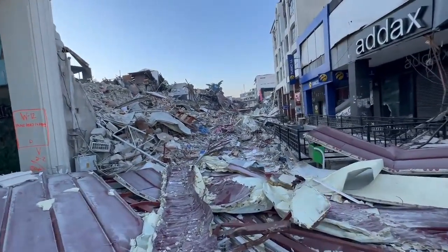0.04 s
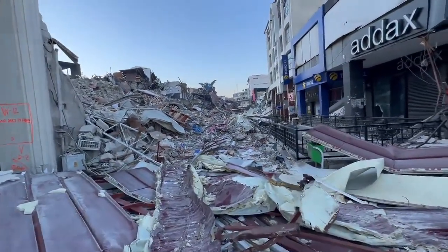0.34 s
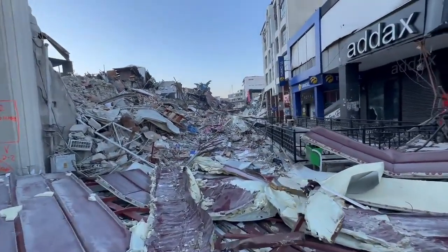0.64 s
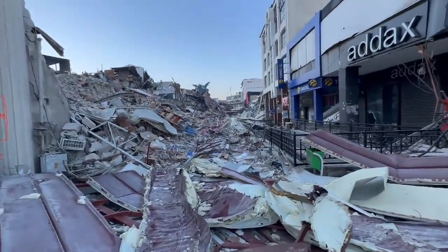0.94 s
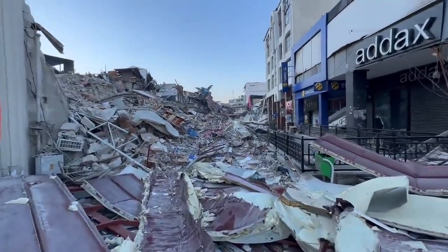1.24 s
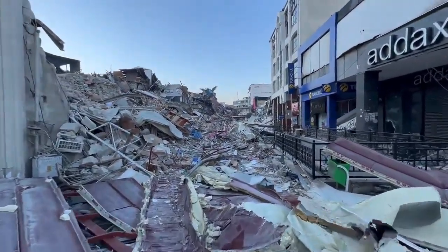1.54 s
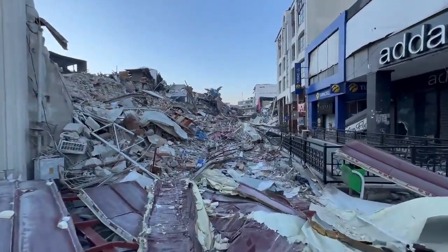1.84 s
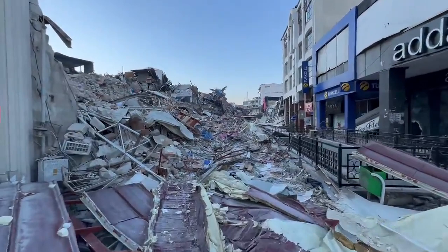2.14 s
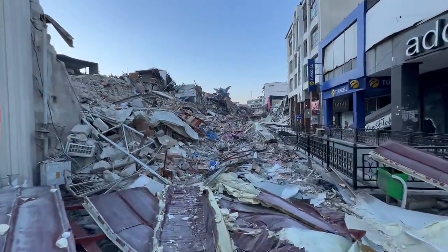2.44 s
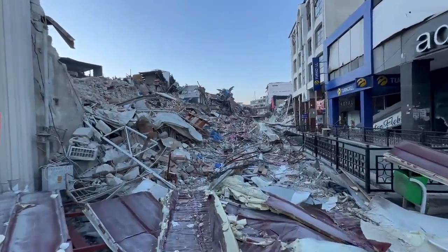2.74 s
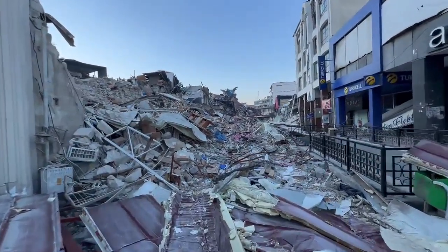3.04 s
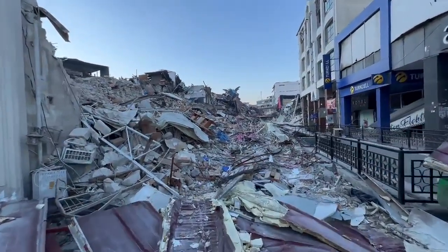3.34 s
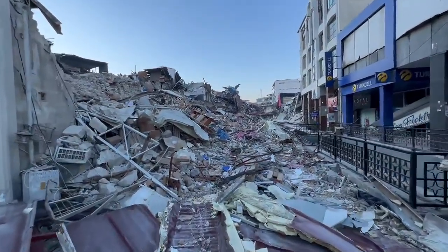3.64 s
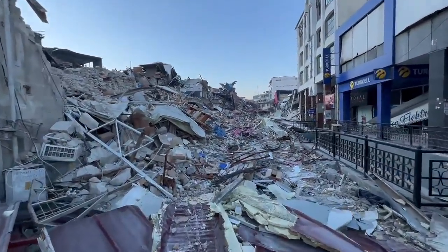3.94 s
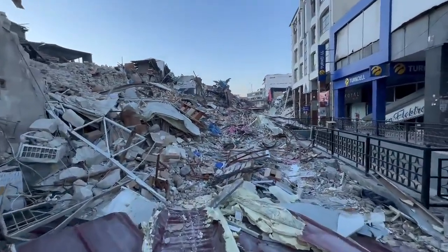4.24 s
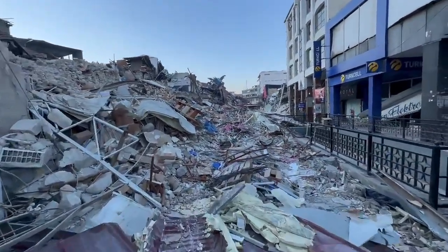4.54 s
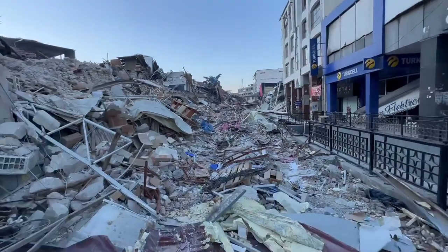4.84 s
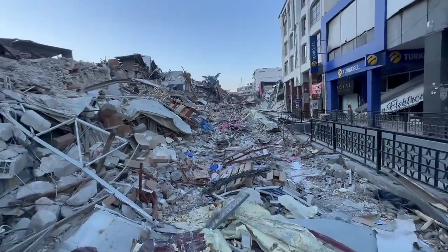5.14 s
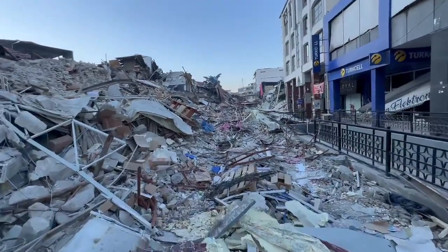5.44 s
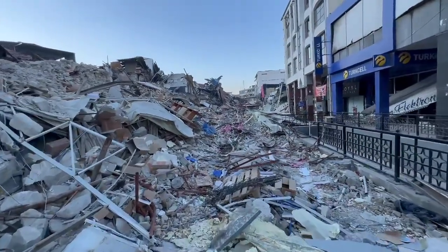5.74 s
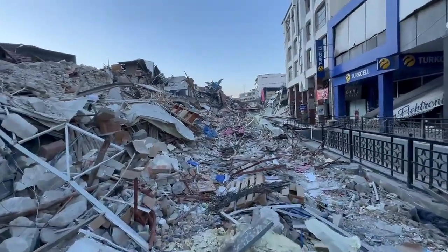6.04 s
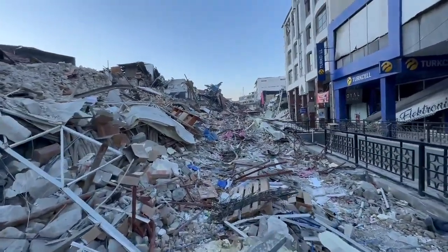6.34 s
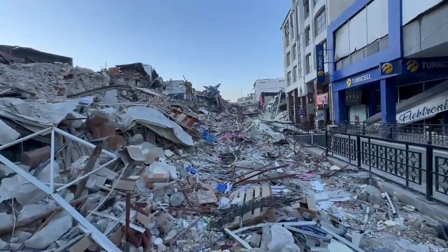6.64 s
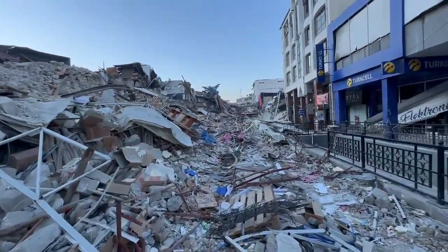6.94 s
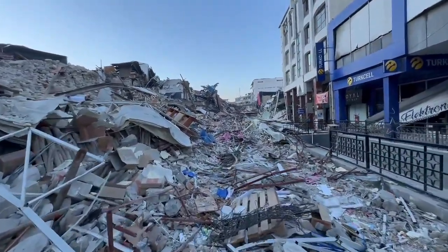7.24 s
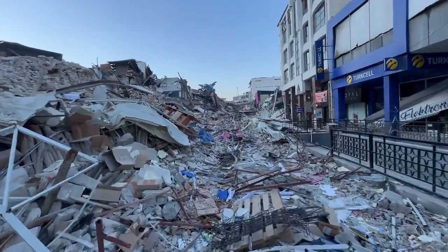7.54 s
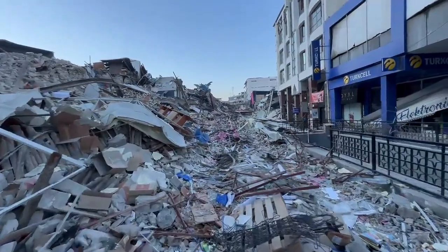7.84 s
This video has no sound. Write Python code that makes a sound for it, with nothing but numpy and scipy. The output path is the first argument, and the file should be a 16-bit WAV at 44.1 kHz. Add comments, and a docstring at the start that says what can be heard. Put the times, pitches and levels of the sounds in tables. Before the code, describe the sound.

Slow, uneven footsteps cross broken concrete and fallen metal roofing in a ruined street. Each step crushes grit, snaps small chips and knocks loose pieces together, making the sheets rumble and briefly ring. The clatter grows louder in the last few steps. Light wind buffets the hand-held microphone, fingers bump it softly, and a faint low outdoor rumble lies underneath.

```python
"""Footsteps pick a way over fallen roofing sheets and broken concrete in a ruined street.
They snap chips, crush grit and knock loose panels and lumps together, which sets the metal ringing.
As the weight rolls on, the sheet rumbles and rubble crunches; there are short scrapes and faint ticks.
The street murmurs and gives a short, dull echo. Light wind buffets the hand-held microphone,
and shifting fingers bump its housing."""
import sys
import numpy as np
from scipy import signal
from scipy.fft import rfft, irfft, next_fast_len
from scipy.io import wavfile

SR = 44100
rng = np.random.default_rng(int(sys.argv[2]) if len(sys.argv) > 2 else 0)


def wrap_up_sound(samples):
    """Save the sound to the file named by the first command line argument, as 16-bit audio."""
    columns = np.atleast_2d(samples).T
    # keep every value between -1 and 1, then stretch to whole-number steps
    tamed = np.clip(columns, -1, 1)
    steps = np.round(tamed * 32767).astype(np.int16)
    wavfile.write(sys.argv[1], SR, steps)


N = 351918

# Levels are relative. A fade (t60) is the time a sound takes to drop by 60 dB.
# wind on the microphone: (time [s], level [dB])
WIND_LEVELS = [(0.0, -58), (0.42, -42), (0.8, -48.5), (5.7, -54), (6.2, -42.5), (6.93, -36.5),
               (7.98, -35.5)]
# tone of the wind and of the street: (frequency [Hz], level [dB])
WIND_TONE = [(20, 3), (45, 18.5), (65, 23.5), (95, 20.5), (130, 10), (220, -38)]
STREET_TONE = [(100, 8), (200, -1), (400, -9), (900, -8), (1400, -8), (2500, -21), (7500, -29.5),
               (11000, -44), (15500, -50)]
# chips snapping and longer bursts of crushed grit under the sole:
# (time [s], base fade [s], main level [dB], glassy edge level [dB])
SNAPS_AND_GRIT = [(0.034, 0.24, -41.5, -62), (0.086, 0.11, -32.5, -38.5), (0.647, 0.05, -52, -70),
                  (0.77, 0.048, -45, -68), (1.244, 0.03, -38, -37), (1.438, 0.04, -43.5, -60),
                  (1.975, 0.037, -42.5, -66), (2.207, 0.043, -36, -56), (2.689, 0.055, -50, -70),
                  (3.066, 0.11, -43, -57), (3.093, 0.04, -32.5, -42.5), (3.563, 0.041, -36, -64),
                  (3.985, 0.038, -39.5, -53), (4.014, 0.02, -31.5, -41), (4.061, 0.024, -38, -56),
                  (4.084, 0.054, -31.5, -48), (4.131, 0.081, -36, -48), (4.152, 0.03, -36, -46),
                  (4.299, 0.028, -40, -49), (4.666, 0.04, -35, -54), (4.796, 0.015, -42, -56),
                  (4.927, 0.046, -34, -40.5), (5.141, 0.022, -27, -28), (6.188, 0.025, -31, -62),
                  (6.762, 0.23, -39, -44.5), (6.797, 0.029, -32.5, -46), (7.496, 0.35, -38.5, -44.5),
                  (7.829, 0.021, -22, -35), (7.899, 0.07, -18, -35)]
# their main part and glassy edge: (low edge [Hz], high edge [Hz], fade [times the base fade])
SNAP_AND_GRIT_BANDS = [(1500, 7780, 1.0), (6450, 11800, 0.9)]
# how alike left and right are for sounds at the feet: (frequency [Hz], likeness [1 = the same])
STEREO_LIKENESS = [(100, 0.9), (250, 0.8), (550, 0.5), (1600, 0.55), (3500, 0.2)]
# weight rolls onto a foot: (time [s], length [s], base fade [s], rumble [dB], crunch [dB], grit [dB])
FOOTSTEPS = [(0.06, 0.27, 0.35, -35, -42.5, -43.5), (1.099, 0.15, 0.3, -37, -44, -45),
             (1.24, 0.235, 1.2, -35.5, -35.5, -44), (2.055, 0.24, 0.7, -33, -36.5, -43.5),
             (3.052, 0.39, 0.7, -36, -38.5, -44.5), (4.01, 0.36, 0.4, -39, -38, -40),
             (4.67, 0.034, 1.3, -46.5, -44.5, -45.5), (4.888, 0.27, 1.4, -34, -37.5, -45.5),
             (5.845, 0.47, 1.1, -37, -41, -46), (6.178, 0.067, 0.23, -27, -25.5, -50),
             (6.764, 0.14, 0.9, -33, -36.5, -45), (6.91, 0.23, 1, -48.5, -50, -48),
             (7.29, 0.2, 9, -37.5, -42, -51.5), (7.479, 0.052, 0.3, -35.5, -36, -38.5),
             (7.758, 0.06, 0.3, -39, -37, -42), (7.813, 0.13, 1.2, -22, -27, -30.5)]
# sheet, rubble and grit underfoot: (rise [s], fade [times the base fade], level between steps [dB])
GROUND_LAYERS = [(0.015, 1.4, -52), (0.02, 0.78, -59.5), (0.032, 0.88, -66.5)]
# tone of the sheet, rubble, grit and lone bits of gravel: (frequency [Hz], level [dB])
RUMBLE_TONE = [(100, 0.5), (190, -5), (320, -2), (400, -4.5), (540, -17.5)]
CRUNCH_TONE = [(500, -2.5), (1000, -1.5), (1500, -4.5), (2300, -8)]
GRIT_TONE = [(2200, 3.5), (4500, -1.5), (6500, -2.5), (8800, -5.5), (10500, -34), (15500, -18)]
CRUMB_TONE = [(900, 0), (6000, -3)]
# panels and lumps knocking; a harder contact has a higher cut-off:
# (time [s], pitch [Hz], base fade [s], level [dB], bass lift from weight [dB], cut-off [Hz])
DEBRIS_KNOCKS = [(0.063, 1620, 0.05, -36, -1.5, 1450), (0.084, 1056, 0.13, -26, -1, 1400),
                 (0.116, 1440, 0.068, -22.5, -5, 2000), (0.295, 333, 0.094, -37.5, -2, 750),
                 (0.472, 520, 0.08, -40.5, 2, 850), (0.545, 780, 0.063, -43.5, -2, 795),
                 (1.195, 1060, 0.06, -36, -7, 900), (1.31, 330, 0.13, -39, 2.5, 1500),
                 (1.565, 417, 0.14, -41.5, -1, 950), (2.055, 300, 0.07, -33, -4, 1000),
                 (2.085, 1000, 0.035, -35, -10, 1400), (2.119, 310, 0.04, -31, -12, 450),
                 (2.388, 1100, 0.025, -43, -15, 1400), (2.957, 715, 0.05, -30, -9, 1050),
                 (3.091, 420, 0.062, -21.5, -8, 2100), (3.392, 970, 0.051, -35.5, -0.5, 1930),
                 (3.565, 1890, 0.061, -41, -22, 5950), (4.012, 1680, 0.042, -39.5, 0, 3000),
                 (4.119, 277, 0.1, -34, 2, 2000), (4.301, 212, 0.074, -39.5, 4.5, 800),
                 (4.442, 1410, 0.08, -40.5, -13, 3630), (4.665, 1300, 0.079, -42.5, -1, 4000),
                 (4.88, 270, 0.06, -35.5, 6.5, 550), (4.928, 816, 0.06, -36, -1, 2000),
                 (5.141, 950, 0.05, -33, -22, 5000), (5.497, 117, 0.1, -42.5, 3.5, 750),
                 (5.948, 388, 0.053, -37, 2.5, 650), (6.125, 1460, 0.028, -20.5, -20, 1250),
                 (6.145, 290, 0.06, -24, -6, 1050), (6.187, 980, 0.072, -17, -4, 3700),
                 (6.211, 448, 0.06, -23.5, -3.5, 1500), (6.229, 1015, 0.075, -27.5, 0, 2600),
                 (6.245, 895, 0.062, -26.5, -4, 2400), (6.762, 1100, 0.057, -29.5, -3.5, 520),
                 (6.797, 1073, 0.047, -20.5, -1, 1650), (6.842, 950, 0.08, -33, -1.5, 1900),
                 (6.943, 700, 0.07, -38, -4, 1000), (7.289, 1684, 0.024, -39, -16, 1210),
                 (7.313, 113, 0.056, -41, 8, 1300), (7.344, 91.5, 0.061, -45.5, 13, 1500),
                 (7.493, 364, 0.19, -31.5, -0.5, 1600), (7.659, 1150, 0.044, -25, -6, 900),
                 (7.786, 1650, 0.058, -31, -8, 1700), (7.829, 416, 0.059, -15.5, -2.5, 1500),
                 (7.863, 560, 0.11, -15.5, -2.5, 1210), (7.905, 755, 0.063, -15, -20, 800)]
# a knock's thud, body, clank, edge and crack: (low edge [Hz], high edge [Hz], fade [times the base fade])
KNOCK_BANDS = [(58.3, 276, 2.3), (250, 760, 1.2), (720, 1450, 1.1), (1450, 2900, 1.0), (2400, 5200, 1.2)]
# notes of the loose roofing: (pitch [Hz], level [dB])
SHEET_NOTES = [(318, 1), (603, 0), (1614, 0), (2257, 2), (2607, 6)]
# fingers shifting on the housing: (time [s], level [dB], cut-off [Hz])
FINGER_BUMPS = [(0.297, -31, 300), (0.46, -27, 330), (0.502, -33, 380), (0.59, -31.5, 100),
                (1.71, -30, 212), (2.415, -32.5, 170), (3.37, -30, 302), (3.712, -36, 130),
                (5.486, -25.5, 171)]
# short scrapes and faint, brief ticks of debris: (time [s], length [s], level [dB], starting pitch [Hz])
SCRAPES_AND_TICKS = [(1.099, 0.125, -36.5, 1100), (1.655, 0.035, -48.5, 1500), (1.861, 0.004, -48, 1570),
                     (3.27, 0.03, -37.5, 1200), (4.224, 0.02, -39, 1150), (5.753, 0.004, -53, 1700),
                     (6.228, 0.028, -28, 2400), (6.698, 0.006, -48, 1500)]
# tone of the microphone's shaded right opening: (frequency [Hz], level [dB])
RIGHT_TONE = [(2000, -2.5), (2500, -6), (3200, -14), (4500, -10.5), (5500, -10.5), (6800, -17),
              (7900, -4.5), (9000, -2.5)]
# narrow dips in the microphone's treble: (frequency [Hz], width [Hz])
MIC_DIPS = [(5225, 200), (7540, 340)]


def from_db(db):
    """Turn decibels into a factor to multiply by."""
    return np.exp(np.asarray(db) * (np.log(10) / 20))


def rms_one(x):
    """Scale a sound to an average power of 1."""
    return x / np.sqrt(np.mean(x ** 2) + 1e-20)


def in_time(rows):
    """Fill in a table's columns at every sample."""
    times, *columns = np.transpose(rows)
    return [np.interp(np.arange(N) / SR, times, column) for column in columns]


def at_hz(points, hz):
    """Read a table at any frequency, with octaves evenly spaced."""
    frequencies, values = np.transpose(points)
    return np.interp(np.log(hz), np.log(frequencies), values)


def band(x, low_hz, high_hz, order=2):
    """Keep the sound between two frequencies."""
    edges = [low_hz, min(high_hz, SR / 2.1)]
    return signal.sosfilt(signal.butter(order, edges, "band", fs=SR, output="sos"), x)


def pair(two, alike):
    """Blend two unrelated signals into left and right with the given likeness."""
    middle = np.sqrt(1 + alike) * two[0]
    sides = np.sqrt(1 - alike) * two[1] * np.array([[1], [-1]])
    return (middle + sides) / np.sqrt(2)


def ring(x, hz, t60):
    """Let a sound ring at one pitch."""
    decay = from_db(-60 / (t60 * SR))
    feedback = [1, -2 * decay * np.cos(2 * np.pi * hz / SR), decay ** 2]
    return signal.lfilter(np.array([1, 0, -1]) * (1 - decay ** 2) / 2, feedback, x + 1e-18)


def noise(tone, alike):
    """Smooth stereo noise with the given tone and a power of 1."""
    size = next_fast_len(N)
    hz = np.arange(size // 2 + 1) * SR / size + 1e-3
    gain = from_db(at_hz(tone, hz)) / np.sqrt(1 + (tone[0][0] / hz) ** 6)
    shaped = irfft(rfft(rng.standard_normal((2, size))) * gain, size)[:, :N]
    return rms_one(pair(shaped, alike))


def add(out, start_s, sound):
    """Mix a sound in at a given time."""
    at = int(start_s * SR)
    out[:, at:at + sound.shape[1]] += sound[:, :N - at]


def wind(changes_per_s=9):
    """Wind buffets the microphone: a low rumble whose level wavers at random."""
    level_db, = in_time(WIND_LEVELS)
    waver = np.interp(np.arange(N) / SR * changes_per_s, np.arange(4000), rng.standard_normal(4000))
    return from_db(level_db + 2 * waver) * noise(WIND_TONE, alike=0.5)


def street_murmur():
    """A faint, steady, low noise from all around."""
    return from_db(-45.5) * noise(STREET_TONE, alike=0.048)


def struck_piece(pitch_hz, t60, levels, bands, first_db, main_db, overtone_db, rocking_db):
    """An uneven piece is hit and chatters: one main note and a few others stand out of fading noise."""
    t = np.arange(SR // 4) / SR
    contacts = np.interp(t, np.linspace(0, t[-1], num=120), rng.standard_normal(120))
    first_hit = from_db(first_db) * np.exp(-t / 0.0011)
    force = from_db(1.76 * np.clip(contacts, -1, 1)) + first_hit
    force *= np.minimum(t / 0.0025, 1)   # rough edges need a moment to close
    overtones_hz = np.minimum(pitch_hz * 2 ** rng.uniform(0.4, 2.6, size=6), SR / 3)
    out = 0
    for level_db, (low_hz, high_hz, lasting) in zip(levels, bands):
        fall_db = -60 * t / (t60 * lasting)
        decay = from_db(fall_db) + from_db(rocking_db + fall_db / 3)   # the piece rocks on afterwards
        chatter = rng.standard_normal((2, len(t))) * force * decay
        main = from_db(main_db) * ring(chatter, pitch_hz, t60=20 / pitch_hz)
        overtones = sum(ring(chatter, hz, t60=36 / hz) for hz in overtones_hz if low_hz < hz < high_hz)
        hit = band(chatter + main + from_db(overtone_db) * overtones, low_hz, high_hz, order=3)
        hit /= np.sqrt(np.mean(hit[:, t < 0.025] ** 2, axis=1, keepdims=True))   # power 1 at the start
        out = out + from_db(level_db) * pair(hit, at_hz(STEREO_LIKENESS, np.sqrt(low_hz * high_hz)))
    return out


def snaps_and_grit():
    """Chips snap and grit is crushed in longer bursts under the sole, each at its own high pitch."""
    out = np.zeros((2, N))
    for start_s, t60, *levels in SNAPS_AND_GRIT:
        pitch_hz = 2300 * 2 ** rng.uniform(-0.58, 0.61)
        add(out, start_s, struck_piece(pitch_hz, t60, levels, SNAP_AND_GRIT_BANDS,
                                       first_db=-22.5, main_db=6.5, overtone_db=-3, rocking_db=-45))
    return out


def press(t, rise_s, length_s, t60, sag_db_per_s=7):
    """One step's loudness: it rises, sags as the rubble packs down, then dies away."""
    fall_db = sag_db_per_s * np.maximum(t, 0) + 60 * np.maximum(t - length_s, 0) / t60
    return np.clip(t / rise_s, 0, 1) * from_db(-fall_db)


def underfoot_db():
    """Rumble, crunch and grit levels follow the steps; loose debris trickles on after the foot lifts."""
    t = np.linspace(0, N / SR, num=4000)
    levels = []
    for layer, (rise_s, lasting, rest_db) in enumerate(GROUND_LAYERS):
        power = from_db(rest_db) ** 2
        for start_s, length_s, t60, *layer_db in FOOTSTEPS:
            pressed = from_db(layer_db[layer]) * press(t - start_s, rise_s, length_s, t60 * lasting)
            trickle_db = min(layer_db[layer] - 18.5, -50.5)   # only so much of it lies loose
            trickle = from_db(trickle_db) * press(t - start_s, rise_s, length_s, t60=4.4)
            power = power + pressed ** 2 + trickle ** 2
        levels.append(10 * np.log10(power))
    return in_time(np.column_stack([t, *levels]))


def grains(tone, level_db, peak_per_s, cycles, spread_db, notes):
    """Tiny slips and breaks each ring at one of several notes; they crowd together as the foot presses."""
    out = np.zeros((2, N))
    pitches = np.geomspace(tone[0][0], tone[-1][0], notes)
    pitches *= (pitches[1] / pitches[0]) ** rng.uniform(-0.5, 0.5, notes)
    rate = peak_per_s * from_db((level_db - level_db.max()) / 4)
    at = np.flatnonzero(rng.random(N) < rate / SR)
    sizes = from_db(spread_db * np.minimum(rng.exponential(1, N)[at], 3)) / np.sqrt(rate[at])
    note_of_grain = rng.integers(0, notes, N)[at]
    push = rng.standard_normal((2, N))[:, at]
    for note, hz in enumerate(pitches):
        chosen = note_of_grain == note
        clicks = np.zeros((2, N))
        clicks[:, at[chosen]] = sizes[chosen] * pair(push[:, chosen], at_hz(STEREO_LIKENESS, hz))
        out += from_db(at_hz(tone, hz)) * ring(clicks, hz, t60=cycles / hz)
    return from_db(level_db) * rms_one(band(out, pitches[0] / 2, pitches[-1] * 1.4))


def slips(per_s, t60, steady):
    """Loudness of rubble giving way: sudden jerks that die away on top of a steady grind."""
    starts = (rng.random(N) < per_s / SR) * rng.random(N)
    jerks = signal.lfilter([1], [1, -from_db(-60 / (t60 * SR))], starts)
    return rms_one(steady + jerks)


def tread():
    """Under the weight the sheet flexes, lumps grind and grit is crushed; the sole scuffs, crumbs tick."""
    rumble_db, crunch_db, grit_db = underfoot_db()
    rumble = grains(RUMBLE_TONE, rumble_db, peak_per_s=2000, cycles=15.7, spread_db=1, notes=12)
    crunch = grains(CRUNCH_TONE, crunch_db, peak_per_s=7000, cycles=34, spread_db=1, notes=16)
    grit = grains(GRIT_TONE, grit_db, peak_per_s=20000, cycles=30, spread_db=1.2, notes=16)
    scuff = from_db(grit_db - 6) * noise(GRIT_TONE, alike=0)
    crumbs = grains(CRUMB_TONE, grit_db - 8.5, peak_per_s=200, cycles=22, spread_db=1.5, notes=6)
    jerks = slips(per_s=80, t60=0.06, steady=0.8)
    return from_db(-2.5) * rumble + jerks * (crunch + from_db(-0.7) * (grit + scuff)) + crumbs


def knock_tone_db(pitch_hz, weight_db, cutoff_hz):
    """Band levels: weight sets the bass, a piece favours its own pitch, a soft contact dulls the treble."""
    hz = np.array([np.sqrt(low * high) for low, high, _ in KNOCK_BANDS])
    octaves_down = np.maximum(np.log2(1240 / hz), 0)
    bass_db = weight_db * (octaves_down / 3) ** 2
    piece_db = 4.5 * np.exp(-np.log2(hz / pitch_hz) ** 2)
    dulling_db = 10 * np.log10(1 + (hz / cutoff_hz) ** 4.9)
    return bass_db + piece_db - dulling_db


def knocks():
    """Panels and lumps clack together; their blunt edges make little top treble."""
    out = np.zeros((2, N))
    for start_s, pitch_hz, t60, level_db, weight_db, cutoff_hz in DEBRIS_KNOCKS:
        levels = level_db + knock_tone_db(pitch_hz, weight_db, cutoff_hz)
        add(out, start_s, struck_piece(pitch_hz, t60, levels, KNOCK_BANDS,
                                       first_db=-7, main_db=7, overtone_db=3, rocking_db=-33))
    return signal.sosfilt(signal.butter(6, 9500, fs=SR, output="sos"), out)


def sheet_metal(knocked, t60):
    """Every knock sets the loose roofing ringing."""
    return sum((-1) ** k * from_db(db) * ring(knocked, hz, t60) for k, (hz, db) in enumerate(SHEET_NOTES))


def street_echo(x, t60):
    """Sound bounces back, scattered and dull, from rubble heaps and shop fronts."""
    t = np.arange(SR) / SR
    envelope = from_db(-60 * t / t60) * (1 - np.exp(-t / 0.01))
    scatter = band(rng.standard_normal((2, SR)) * envelope, 100, 7000, order=1)
    scatter = pair(scatter, alike=0.081)
    scatter /= np.sqrt(np.sum(scatter ** 2) * 2)
    return signal.fftconvolve(x, scatter, axes=1)[:, :N]


def finger_bumps(rise_s=0.0083, t60=0.13, low_hz=49):
    """Each shift of the grip sends a short, dull stutter through the housing."""
    out, t = np.zeros((2, N)), np.arange(SR // 4) / SR
    envelope = np.minimum(t / rise_s, 1) * from_db(-60 * t / t60)
    sides = (1.24, -0.7)   # the shake pushes left and right in opposite directions
    for start_s, level_db, cutoff_hz in FINGER_BUMPS:
        rub = band(rng.standard_normal(len(t)) * envelope, low_hz, cutoff_hz)
        rub /= np.sqrt(np.mean(rub[t < 0.04] ** 2))   # power 1 at the start
        add(out, start_s, from_db(level_db - 1.5) * np.outer(sides, rub))
    return out


def scrapes_and_ticks(catches_per_s=600, width_hz=600, octaves_per_s=-1.5, t60=0.1):
    """Uneven catches ring one rough, sinking note: a short scrape or, if very brief, a tick of debris."""
    out, t = np.zeros((2, N)), np.arange(SR // 4) / SR
    decay = np.exp(-np.pi * width_hz / SR)
    for start_s, length_s, level_db, pitch_hz in SCRAPES_AND_TICKS:
        caught = rng.random(len(t)) < catches_per_s / SR
        catches = caught * pair(rng.standard_normal((2, len(t))), at_hz(STEREO_LIKENESS, pitch_hz))
        sinking_hz = pitch_hz * np.exp2(octaves_per_s * t)
        wave = np.exp(2j * np.pi * np.cumsum(sinking_hz) / SR)
        # each catch starts a brief burst of the sinking wave
        bursts = np.imag(wave * signal.lfilter([1], [1, -2 * decay, decay ** 2], catches / wave))
        fall_db = 60 * np.maximum(t - length_s, 0) / t60
        add(out, start_s, rms_one(bursts) * from_db(level_db - fall_db))
    return out


def right_opening(x, resonance_hz=2540, width_hz=940):
    """The housing shades the right opening; near its resonance it swings against the left one."""
    size = next_fast_len(N + SR // 4)
    hz = np.arange(size // 2 + 1) * SR / size + 1e-3
    shade = from_db(at_hz(RIGHT_TONE, hz))
    resonance = resonance_hz ** 2 - hz ** 2 + 1j * hz * width_hz
    phase_turn = resonance.conj() / resonance
    return irfft(rfft(x, size) * shade * phase_turn, size)[:N]


def scene():
    """Steps close below the microphone, with wind, the street around them and fingers on the housing."""
    knocked = knocks()
    ringing = from_db(-4.5) * sheet_metal(knocked, t60=0.19)
    feet = knocked + ringing + snaps_and_grit() + scrapes_and_ticks() + tread()
    background = wind() + street_murmur()
    echo = from_db(-7.5) * street_echo(feet, t60=0.35)
    return feet + background + echo + finger_bumps()


def record(dry):
    """The microphone lifts bass and treble on the left, shades the right and has two narrow dips."""
    bass = band(dry[0], 21, 394, order=1)
    treble = band(dry[0], 2400, 9400, order=1)
    left = from_db(-3.5) * dry[0] + 0.37 * bass + 0.29 * treble
    stereo = np.array([left, right_opening(dry[1])])
    for dip_hz, width_hz in MIC_DIPS:
        edges = [dip_hz - width_hz / 2, dip_hz + width_hz / 2]
        stereo = signal.sosfilt(signal.butter(2, edges, "bandstop", fs=SR, output="sos"), stereo)
    top_cut = signal.cheby2(16, 70, 16600, fs=SR, output="sos")   # 70 dB down from 16600 Hz up
    return signal.sosfilt(top_cut, np.tanh(stereo))   # tanh rounds off the loudest peaks


dry = scene()
out = record(dry)
wrap_up_sound(out)
```